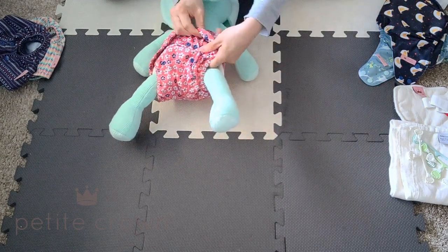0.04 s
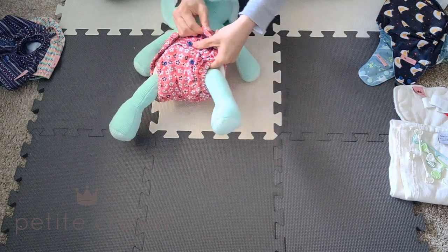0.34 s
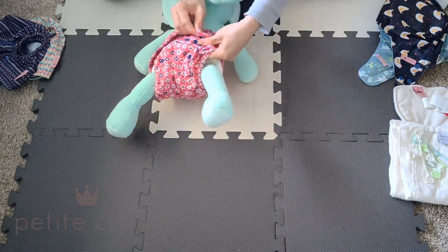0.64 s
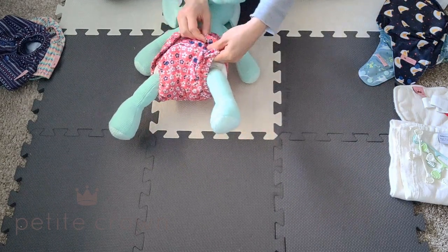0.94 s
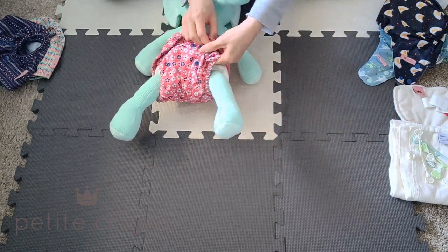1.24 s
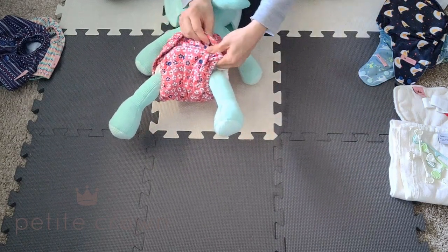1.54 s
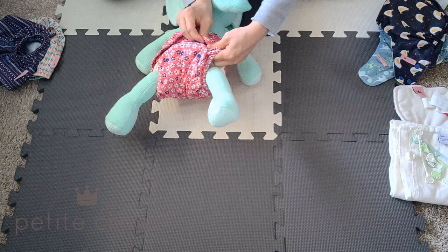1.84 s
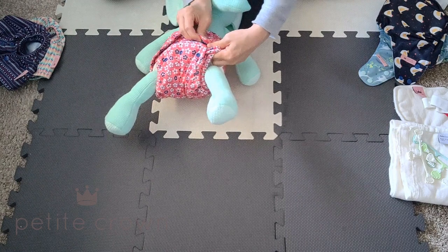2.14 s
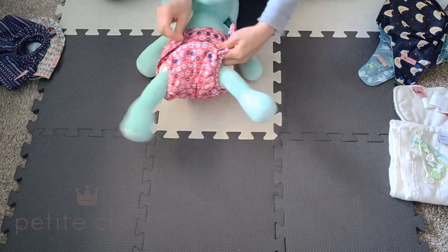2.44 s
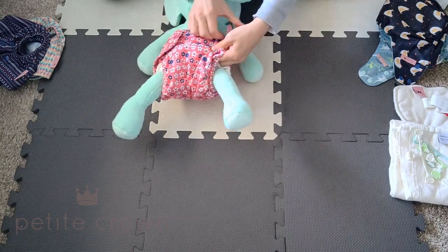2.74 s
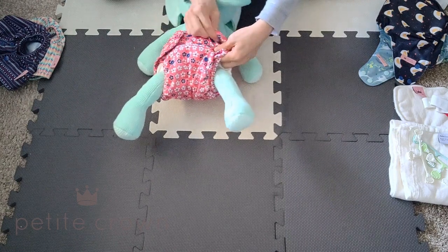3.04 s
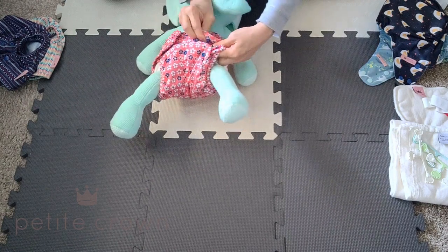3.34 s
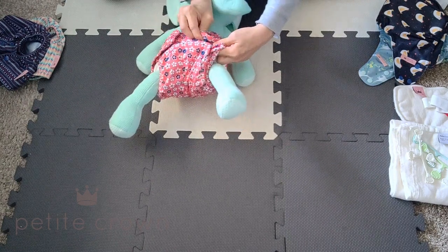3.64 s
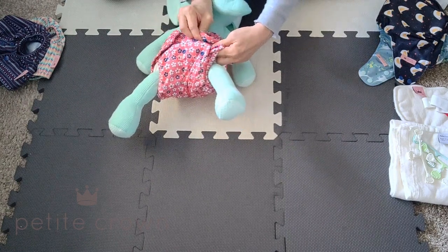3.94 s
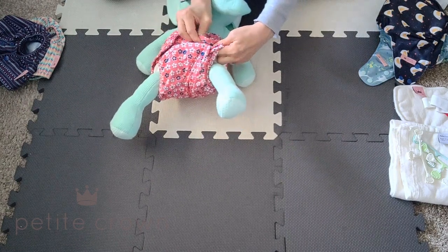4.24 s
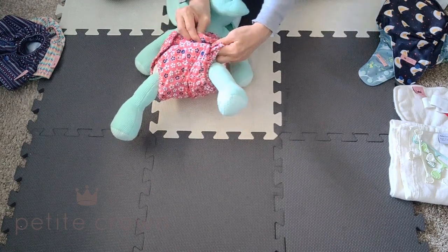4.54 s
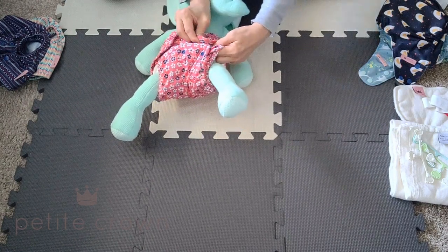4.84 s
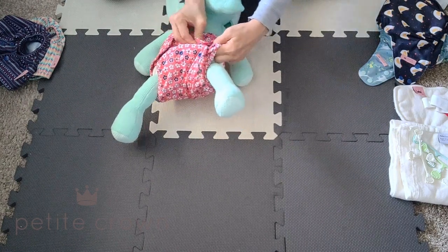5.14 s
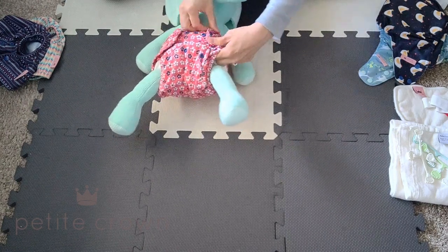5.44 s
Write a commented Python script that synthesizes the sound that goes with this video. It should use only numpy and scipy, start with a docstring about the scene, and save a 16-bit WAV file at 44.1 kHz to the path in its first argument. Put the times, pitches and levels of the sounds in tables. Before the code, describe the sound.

Close handling of a fabric cover: soft sliding, a burst of tugs and knocks, then a plastic snap clicks loudly home.

```python
"""Hands pull a cloth cover round a soft toy and press its plastic snaps together, close by in a quiet room.
First the cloth hisses as it slides in tiny slips, fingers knock lightly and a fingertip briefly skids.
At about 2.6 s hard tugs make the cloth flap, while fingers and snap halves knock loudly.
Softer sliding follows, then a short rest just after 4 s, then more small knocks.
At 5.3 s one snap pops home and rings through the room, and the cloth rustles to the end."""
import sys
import numpy as np
from scipy import signal
from scipy.fft import rfft, irfft
from scipy.io import wavfile
from scipy.ndimage import uniform_filter1d

SR = 44100
rng = np.random.default_rng(int(sys.argv[2]) if len(sys.argv) > 2 else 0)


def file_out(sig):
    """Save sig as 16-bit WAV at sys.argv[1]."""
    # one column per channel
    cols = np.atleast_2d(sig).T
    # limit, then scale
    lim = np.clip(cols, -1, 1)
    pcm = np.round(lim * 32767).astype(np.int16)
    wavfile.write(sys.argv[1], SR, pcm)


N = 250488
T = np.arange(N) / SR


def undb(db):
    """Turn decibels into a number to multiply by."""
    return 10 ** (np.asarray(db) / 20)


def unit(x):
    """Scale a signal so that its average power is 1."""
    return x / np.sqrt(np.mean(x ** 2))


def add(out, start_s, x):
    """Mix x into out, beginning at start_s."""
    i = int(start_s * SR)
    out[i:i + len(x)] += x[:N - i]


def colour(x, points, size=4096):
    """Shape the bass and treble of x along a curve of (Hz, dB) points."""
    hz, db = np.transpose(points)
    freqs = np.maximum(np.arange(size // 2 + 1) * SR / size, 1)
    gains = undb(np.interp(np.log(freqs), np.log(hz), db))
    # These steps build a filter that never sounds before its input does.
    cepstrum = irfft(np.log(gains))
    cepstrum[1:size // 2] *= 2
    cepstrum[size // 2 + 1:] = 0
    response = irfft(np.exp(rfft(cepstrum)))
    return signal.oaconvolve(x, response)[:len(x)]


def resonate(x, hz, width_hz):
    """Let x ring at one pitch; a smaller width rings longer."""
    return signal.lfilter(*signal.iirpeak(hz, hz / width_hz, fs=SR), x)


def fade(t, fade_s):
    """Die away by 60 dB in fade_s seconds, the fade time."""
    return np.exp(-np.log(1000) * t / fade_s)


def ring(tones, t):
    """Tones that start together and each die away, as after a strike."""
    return sum(undb(db) * fade(t, fade_s) * np.cos(2 * np.pi * hz * t) for hz, db, fade_s in tones)


def wander(per_s):
    """A curve that glides to a new random value per_s times a second."""
    step = int(SR / per_s)
    stairs = np.repeat(rng.standard_normal(N // step + 1), step)
    return unit(uniform_filter1d(stairs, step)[:N])


def slips(per_s, spread_db):
    """Threads catch and let go, making random clicks of uneven size."""
    size = undb(spread_db * np.minimum(rng.exponential(size=N), 3))
    slipping = rng.random(N) < per_s / SR
    return unit(slipping * size * rng.standard_normal(N))


def room(x, fade_s, echo_db):
    """The direct sound, then a blur of echoes that builds up and fades."""
    t = T[:SR // 2]
    build_up = 1 - np.exp(-t / 0.0027)
    tail = rng.standard_normal(len(t)) * fade(t, fade_s) * build_up
    response = undb(echo_db) * tail / np.linalg.norm(tail)
    response[0] += 1
    return signal.oaconvolve(x, response)[:len(x)]


def hush_and_hiss(movement_db):
    """The still room's hush, and the recorder's thin high hiss, which sinks when the handling goes quiet."""
    # Tone of the hush and of the hiss. Each row: frequency in Hz, relative level in dB.
    hush_tone = [(25, 1.5), (55, -1.5), (80, 6), (150, -9.5), (400, -9), (1000, -14), (3000, -17),
                 (6500, -25.5), (10000, -13), (15000, -14)]
    hiss_tone = [(100, -21), (6500, -23), (9000, -12.5), (13000, 4), (15500, 7.5)]
    hush = unit(colour(rng.standard_normal(N), hush_tone)) * undb(-73)
    hiss = unit(colour(rng.standard_normal(N), hiss_tone)) * undb(-64 + 0.7 * movement_db)
    return hush + hiss


def swell(peak_s, rise_s, fall_s):
    """The strength of one pull: the hand speeds up to a peak and slows again."""
    roundness = 1.4  # 1 is pointed, 2 is bell-shaped
    from_peak = np.maximum((peak_s - T) / rise_s, (T - peak_s) / fall_s)
    return undb(-10 * np.minimum(from_peak, 20) ** roundness)


def cloth(movement_db):
    """Fine slips of the weave hiss and coarser jerks of the folds flap; both swell with each pull."""
    # Tone of the sliding and of the flapping. Each row: frequency in Hz, relative level in dB.
    slide_tone = [(150, -17), (600, -20), (1500, -10.5), (2800, -8.5), (4500, 1), (6500, 2.5), (10000, -5),
                  (15000, -10.5)]
    flap_tone = [(40, -28.5), (70, 5), (125, 0.5), (350, -0.5), (600, -7.5), (1200, -10.5), (3000, -14),
                 (7000, -32)]
    # Pulls and tugs. Each row: peak time in seconds, seconds to rise the last 10 dB,
    # seconds to fall the first 10 dB, sliding level in dB, flapping level in dB.
    pulls = [(0, .02, .025, -49.5, -54), (.12, .02, .06, -56.5, -64), (.285, .035, .035, -57, -57),
             (.5, .05, .032, -58, -64), (1.597, .012, .028, -49.5, -60), (1.642, .014, .021, -46.5, -65),
             (1.898, .045, .03, -38.5, -50.5), (1.98, .04, .13, -61.5, -62.5),
             (2.55, .008, .03, -40, -38.5), (2.587, .008, .024, -26.5, -25), (2.64, .025, .048, -27, -34),
             (2.735, .03, .021, -46, -50), (3.07, .025, .06, -62, -71), (3.46, .13, .11, -55.5, -60.5),
             (4.28, .016, .04, -52, -58.5), (4.42, .014, .022, -52.5, -66), (4.57, .045, .04, -58.5, -66),
             (4.695, .014, .022, -55, -62), (4.98, .025, .06, -71, -67), (5.221, .007, .022, -56, -58),
             (5.312, .009, .015, -50, -57), (5.45, .04, .03, -41, -62), (5.55, .03, .08, -36.5, -45.5),
             (5.64, .06, .12, -42.5, -49)]
    # The holding hands shift the cloth a little even between pulls.
    slide_power = undb(-70 + movement_db) ** 2
    flap_power = undb(-71 + movement_db) ** 2
    for peak_s, rise_s, fall_s, slide_db, flap_db in pulls:
        pull = swell(peak_s, rise_s, fall_s)
        slide_power += (undb(slide_db) * pull) ** 2
        flap_power += (undb(flap_db) * pull) ** 2
    catch_db = 1.6 * wander(per_s=70)  # the cloth catches unevenly
    slide = unit(colour(slips(per_s=14000, spread_db=2.3), slide_tone)) * np.sqrt(slide_power)
    flap = unit(colour(slips(per_s=2500, spread_db=2.0), flap_tone)) * np.sqrt(flap_power)
    return room((slide + flap) * undb(catch_db), fade_s=0.17, echo_db=-8.5)


def room_boom(handling):
    """The handling stirs the room, which rings at its own pitches."""
    # Each row: pitch in Hz, width in Hz, level in dB relative to the handling.
    room_tones = [(136.3, 8.1, 1.5), (195.3, 19, 0), (338.8, 12, 0), (375.6, 14, 4), (684.4, 28, -2),
                  (920, 6.7, -3), (1062, 25, -6.5)]
    return sum(undb(db) * resonate(handling, hz, width) for hz, width, db in room_tones)


def knocks():
    """Fingers, folds and snap halves knock: each rings very briefly, with a hard tick on top."""
    # Each row: start in seconds, level in dB, pitch in Hz, width in Hz, tick in dB relative to the ring.
    contacts = [(0.2534, -41, 550, 300, -8), (0.2726, -35, 2010, 500, -24), (0.2738, -39.5, 1150, 350, -24),
                (0.2804, -36.5, 1400, 450, -24), (0.758, -55, 546, 350, -20), (2.548, -26, 517, 403, -4),
                (2.584, -25, 343, 500, -12), (2.5917, -12.5, 2780, 1800, -26), (2.605, -18, 393, 284, -22),
                (2.6643, -13.5, 1450, 2500, -1), (2.6658, -4, 1140, 1700, -4),
                (2.7305, -28, 6500, 900, -17), (4.2603, -37, 2050, 380, 0), (4.261, -40, 470, 400, -5),
                (4.4112, -43.5, 1350, 347, -2), (4.6836, -39, 580, 350, -20),
                (4.6916, -38.5, 794, 800, -10), (4.696, -39, 180, 190, -26), (4.968, -56, 700, 500, -12),
                (5.2182, -42, 3000, 2200, -12), (5.3062, -23.5, 1140, 655, -7),
                (5.315, -24.5, 1000, 510, -7), (5.5194, -33, 1900, 1400, 3), (5.563, -31, 1100, 560, -10),
                (5.598, -27.5, 1100, 1200, 0)]
    out, t = np.zeros(N), T[:SR // 3]
    strike = 1. * (t == 0)
    for start_s, db, hz, width, tick_db in contacts:
        body = resonate(resonate(strike, hz, width), hz, min(3 * width, 9000))
        tick = rng.standard_normal(len(t)) * fade(t, fade_s=0.01)
        knock = body / np.abs(body).max() + undb(tick_db) * tick / np.abs(tick).max()
        add(out, start_s, undb(db) * room(knock, fade_s=0.135, echo_db=-2.5))
    return out


def brief_rubs():
    """Short bursts of quick slips: narrow ones sing as a fingertip skids, wide ones hiss."""
    # Each row: peak time in seconds, spread to each side in seconds, pitch in Hz, width in Hz, level in dB.
    # The row at 1.867 s is a brief bright hiss of cloth as a pull begins.
    rubs = [(1.65, 0.013, 2280, 200, -59), (1.867, 0.017, 5670, 2000, -42.5),
            (3.458, 0.02, 3220, 330, -50.5), (3.491, 0.017, 3440, 350, -52.5),
            (4.464, 0.014, 6300, 600, -64), (4.544, 0.0064, 6000, 1800, -59), (4.582, .024, 6300, 350, -62),
            (4.754, 0.006, 6300, 800, -59)]
    out = np.zeros(N)
    for peak_s, spread_s, hz, width, db in rubs:
        rubbing = slips(per_s=9000, spread_db=3.4)
        band = resonate(resonate(rubbing, hz, width), hz, 2 * width)
        rise_and_fall = np.exp(-0.5 * ((T - peak_s) / spread_s) ** 2)
        out += unit(band) * undb(db) * rise_and_fall
    return out


def snap():
    """The stud jumps through its socket, and a sharp plastic ring fills the room."""
    # The ring of the plastic. Each row: pitch in Hz, relative level in dB, fade time in seconds.
    plastic_tones = [(494, -15, 0.009), (915, -11, 0.013), (2000, -14, 0.0026), (2690, 2, 0.0019),
                     (4650, 2.5, 0.0024), (6300, 12, 0.0025), (6850, -25, .006), (8450, -30, 0.0023)]
    # Faint tones that hang on afterwards. Each row: pitch in Hz, level in dB, fade time in seconds.
    lingering_tones = [(155, -46.5, 6.0), (702, -57.5, 4.3), (1043, -66, 2.2)]
    # First echoes from floor and walls. Each row: delay in seconds, level in dB relative to the pop.
    echoes = [(.0075, -20), (0.0125, -23), (0.0199, -24)]
    pop_s, pop_db = 5.3331, 5
    out, t = np.zeros(N), T[:SR // 2]
    pop = ring(plastic_tones, t)
    pop = undb(pop_db) * pop / np.abs(pop).max()
    add(out, pop_s, room(pop, fade_s=0.45, echo_db=2.5) + ring(lingering_tones, t))
    for delay_s, db in echoes:
        add(out, pop_s + delay_s, undb(db) * pop)
    return out


def scene():
    """The handling and the room it stirs, over a faint hush and hiss."""
    # How much the holding hands shift the cloth. Each row: time in seconds, relative level in dB.
    movement = [(0, 3), (0.45, 4), (0.62, -2), (0.92, 1.5), (1.13, -1.5), (1.42, -1.5), (1.52, -11),
                (1.72, 0), (2.45, -5.5), (2.85, 0), (3.7, 0), (3.97, -4), (4.04, -23), (4.24, -23),
                (4.42, -2), (4.95, 1), (5.12, -10), (5.68, -4)]
    movement_db = np.interp(T, *np.transpose(movement))
    handling = cloth(movement_db) + knocks() + brief_rubs() + snap()
    return (handling + room_boom(handling) + hush_and_hiss(movement_db))[None]


def record(dry):
    """A bright little microphone thins the bass, rounds the loudest peak and cuts the highest treble."""
    # Its tone, with a bright peak and a steep drop above. Each row: frequency in Hz, boost or cut in dB.
    mic_tone = [(30, -10.5), (100, -1.5), (4000, 4.5), (5400, 2.5), (5900, 5.5), (6400, 9), (7000, 1.5),
                (7500, -2.5), (8000, -14), (11000, -11.5), (15000, -13.5)]
    low_cut_hz, top_cut_hz, ceiling = 75, 15750, 0.92
    bass_cut = signal.butter(2, low_cut_hz, "high", fs=SR, output="sos")
    treble_cut = signal.ellip(10, 0.2, 80, top_cut_hz, fs=SR, output="sos")
    heard = signal.sosfilt(bass_cut, colour(dry[0], mic_tone))
    rounded = ceiling * np.tanh(heard / ceiling)
    return signal.sosfilt(treble_cut, rounded)[None]


dry = scene()
out = record(dry)
file_out(out)
```